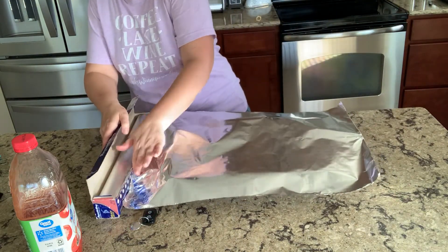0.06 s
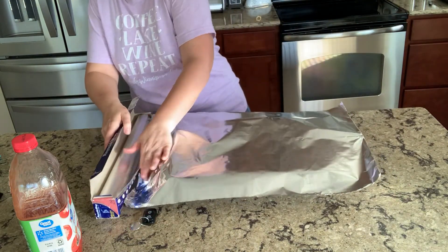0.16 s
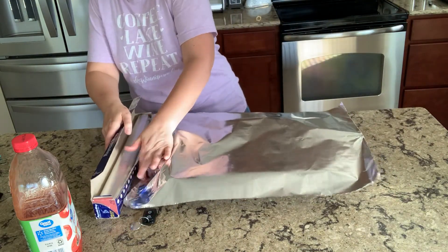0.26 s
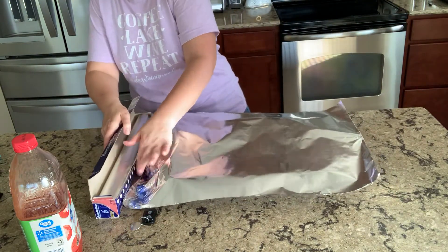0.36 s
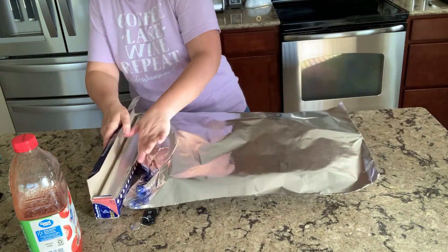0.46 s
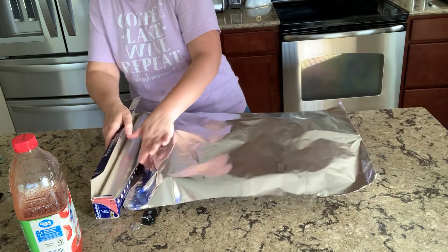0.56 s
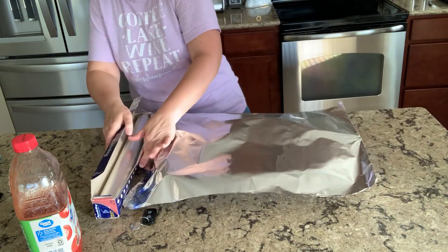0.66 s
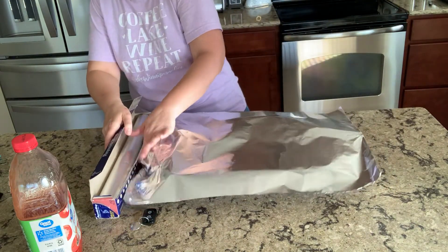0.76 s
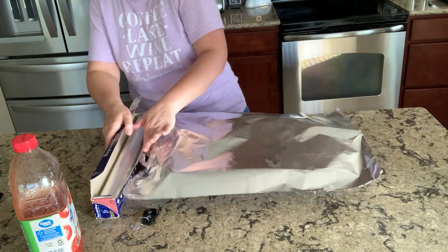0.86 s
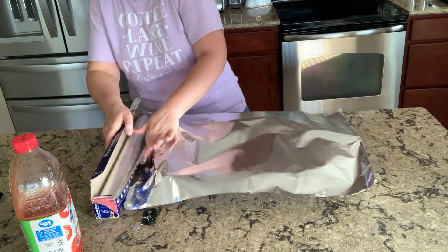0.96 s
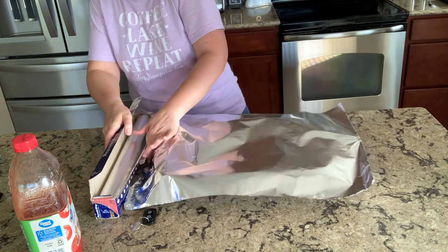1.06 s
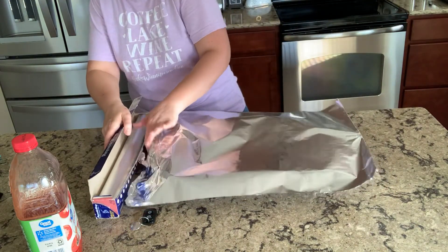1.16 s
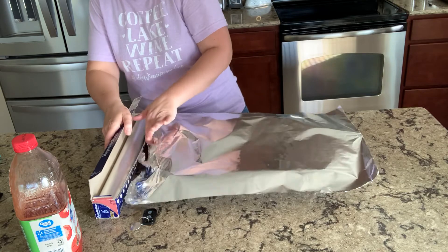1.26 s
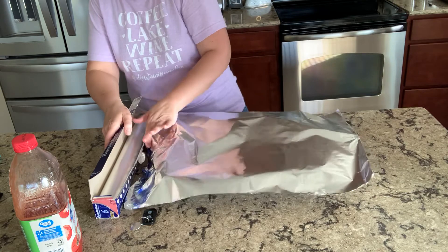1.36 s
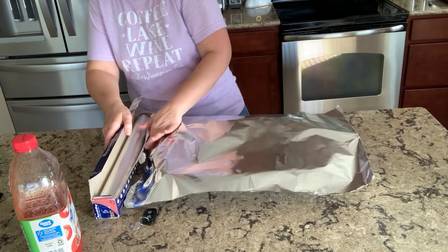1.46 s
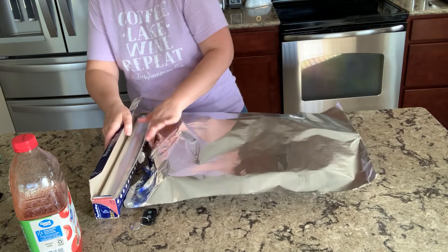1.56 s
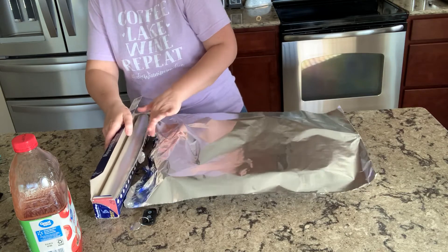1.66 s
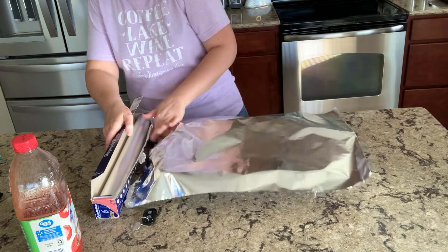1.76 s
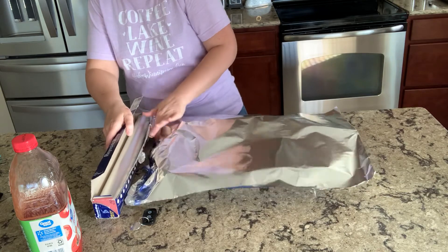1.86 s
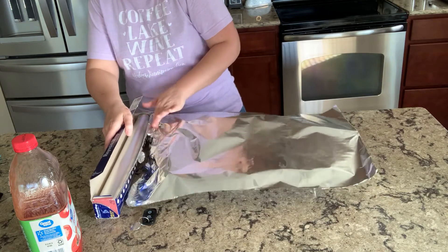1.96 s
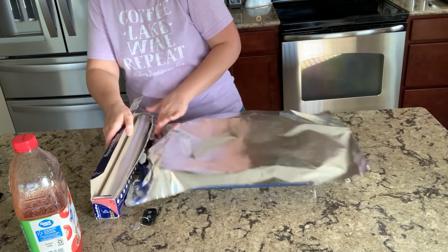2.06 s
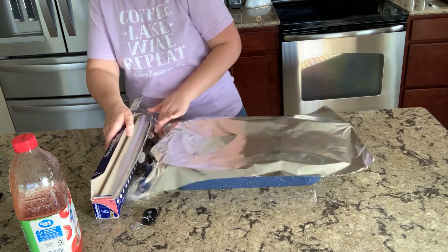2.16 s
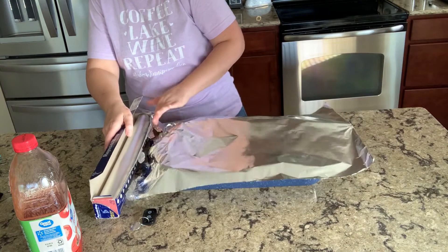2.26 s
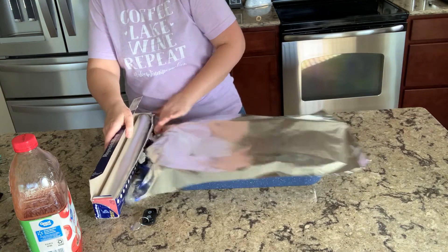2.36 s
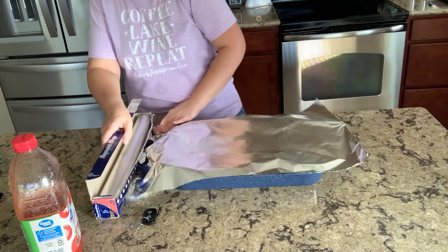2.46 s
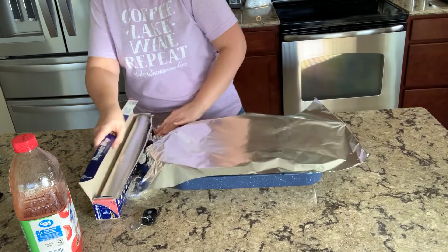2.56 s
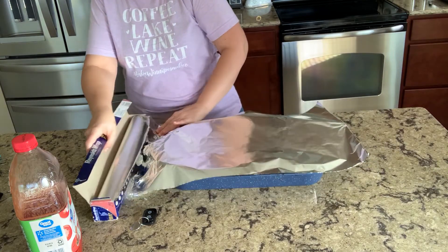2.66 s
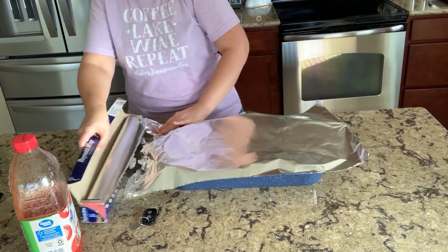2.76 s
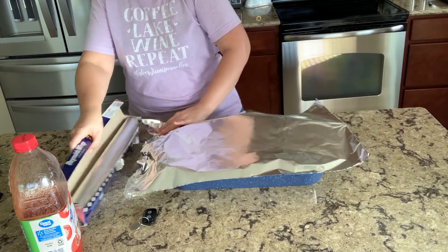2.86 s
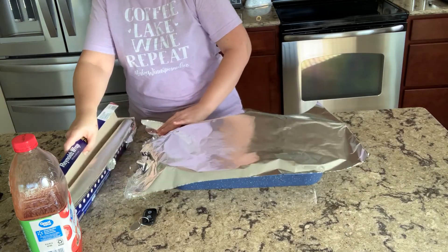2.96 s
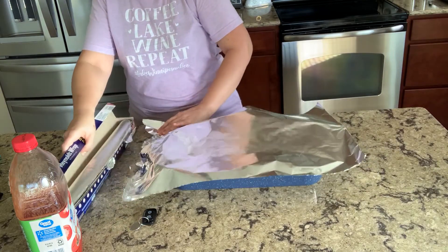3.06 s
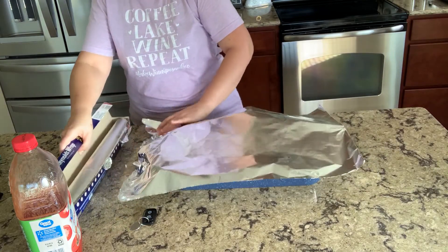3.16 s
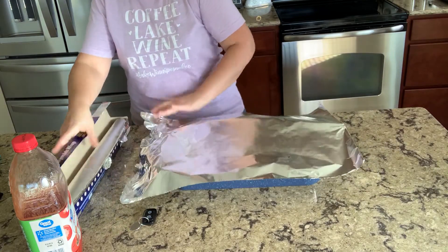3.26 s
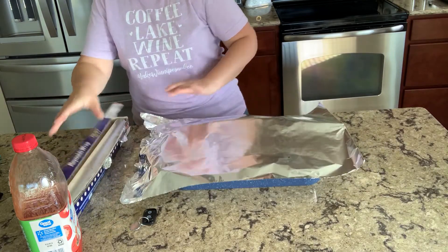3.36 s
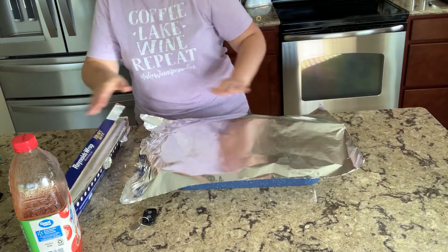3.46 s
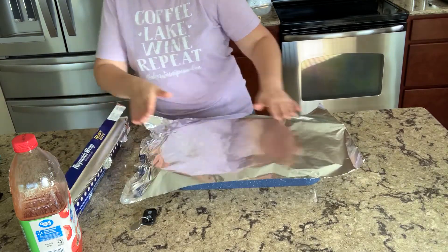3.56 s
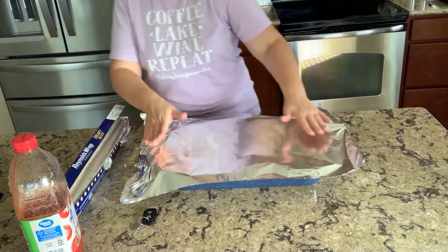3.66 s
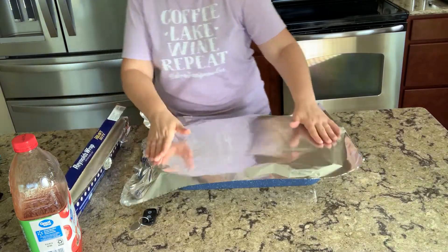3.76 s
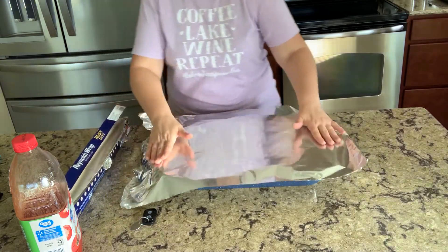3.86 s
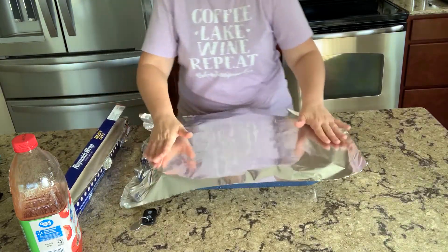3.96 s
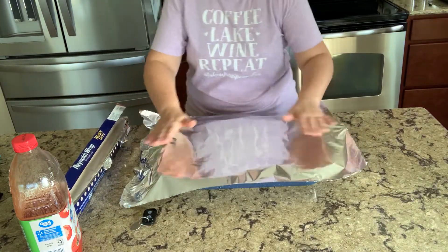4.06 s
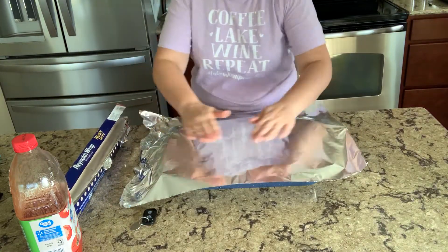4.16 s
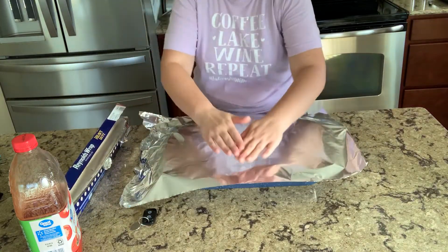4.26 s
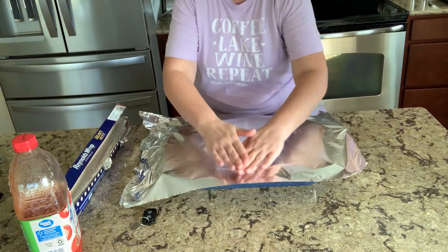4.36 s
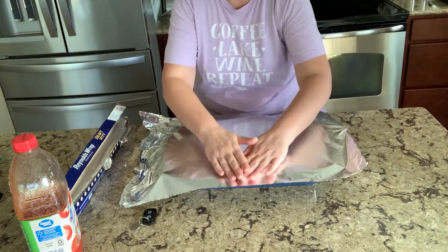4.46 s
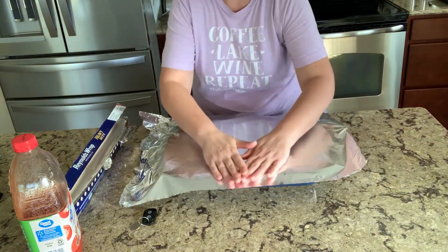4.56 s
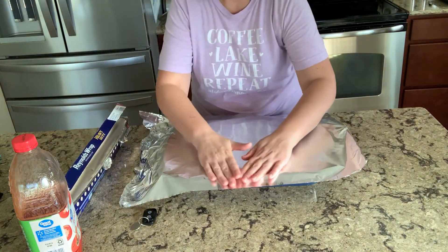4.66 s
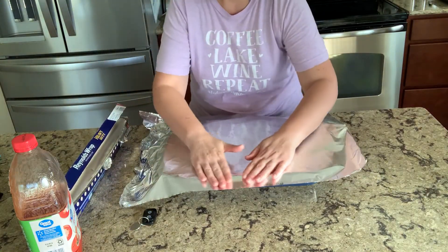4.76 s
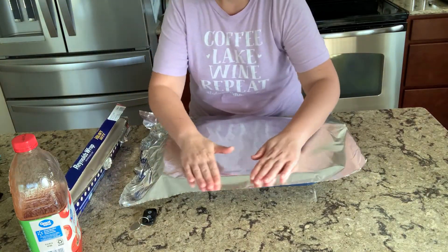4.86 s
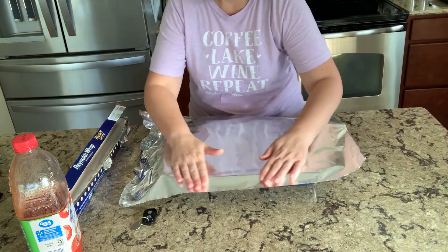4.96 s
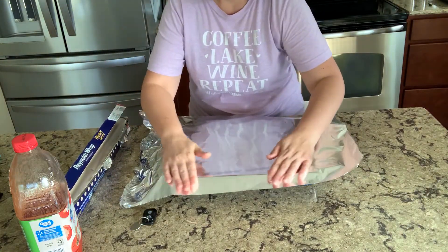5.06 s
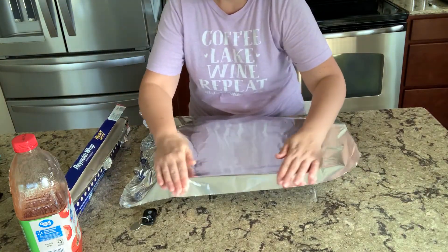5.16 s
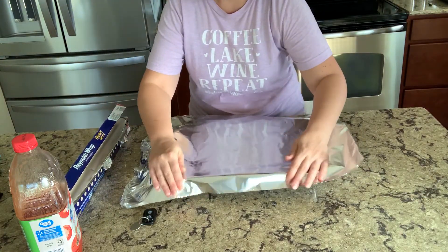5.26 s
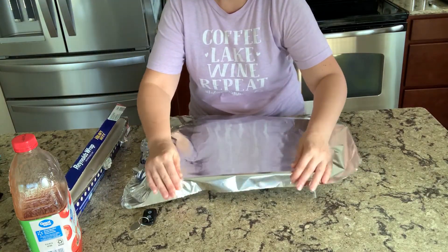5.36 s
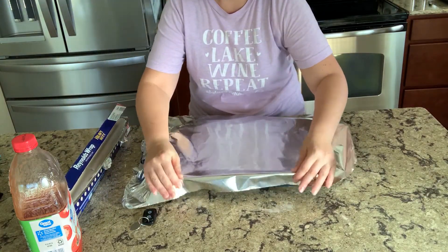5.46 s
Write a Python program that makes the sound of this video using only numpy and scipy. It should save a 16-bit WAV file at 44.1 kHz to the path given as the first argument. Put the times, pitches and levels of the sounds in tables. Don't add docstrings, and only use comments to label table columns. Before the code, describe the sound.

Close, bright foil crackling comes in repeated bursts for about two and a half seconds as a sheet is worked along its box and torn off. Cardboard knocks follow near three seconds, then a sharp rustle and softer, sparser crinkles as it is pressed down. A hard kitchen rings briefly, a fridge hums faintly, and a phone's stereo microphones overload slightly on peaks.

```python
import sys
import numpy as np
from scipy import signal
from scipy.fft import rfft, irfft, next_fast_len
from scipy.io import wavfile
from scipy.ndimage import uniform_filter1d

SR = 44100
rng = np.random.default_rng(int(sys.argv[2]) if len(sys.argv) > 2 else 0)


def voltage_ratio(level):
    return 10 ** (np.asarray(level, float) / 20)


def store_wav(level_fs):
    pcm = np.round(np.clip(np.atleast_2d(level_fs), -1, 1) * 32767)
    wavfile.write(sys.argv[1], SR, pcm.T.astype(np.int16))


N = 243873
SIZE = next_fast_len(N + SR)
HZ = np.fft.rfftfreq(SIZE, 1 / SR) + 1
T = np.arange(N) / SR


def along(table, hz):
    table_hz, *columns = np.transpose(table)
    return np.squeeze([np.interp(np.log(hz), np.log(table_hz + 1), column) for column in columns])


def unit(x):
    return x / np.sqrt(np.mean(np.abs(x) ** 2))


def wander(spacing, smooth, rows=1):
    steps = rng.standard_normal((rows, N // spacing + 1))
    return unit(uniform_filter1d(np.repeat(steps, spacing, axis=1)[:, :N], smooth))


def fade(t, t60):
    return np.exp(-np.log(1000) * t / t60)


def even(response, width_hz):
    return response / np.sqrt(uniform_filter1d(np.abs(response) ** 2, int(width_hz * SIZE / SR)))


def ports(shared, left, right):
    # (frequency [Hz], share [0-1])
    alike = [(60, .7), (500, .55), (2000, .55), (4500, .14), (6400, .25), (8100, .6), (8300, .985),
             (8900, .992), (9600, .998), (9750, .7), (12800, .75), (13200, .99), (15000, .99), (15500, .92)]
    # (frequency [Hz], left ahead of right [rad])
    lead = [(0, 0), (520, -.4), (1300, -.3), (3450, -.9), (5500, -.6), (6700, 1.9), (7600, 2.5),
            (8300, np.pi), (9600, np.pi), (10100, 3.7), (12300, 5.4), (13200, 2 * np.pi)]
    # (frequency [Hz], left minus right [dB])
    balance = [(30, 8), (80, 1.5), (250, 0.8), (700, 0.1), (2800, -1), (8000, -0.1)]
    share = np.clip(along(alike, HZ), 0, 1)
    together = np.sqrt(share) * shared
    own = np.sqrt(1 - share)
    turn = np.exp(.5j * np.interp(HZ, *np.transpose(lead)))
    lean = voltage_ratio(along(balance, HZ) / 2)
    return np.array([(together * turn + own * left) * lean, (together / turn + own * right) / lean])


def kitchen_air():
    # (frequency [Hz], density [dB per Hz])
    air_colour = [(20, -45), (35, -27), (55, -4), (120, -3), (300, -6), (420, -15), (900, -18), (2240, -26),
                  (3600, -26), (5800, -35), (7000, -44), (9000, -50), (12000, -44), (15000, -52)]
    # (frequency [Hz], level [dB])
    hum_tones = [(56, -59), (119, -54), (183, -52.5)]
    noise = ports(*rfft(rng.standard_normal((3, SIZE))))
    air = irfft(noise * voltage_ratio(along(air_colour, HZ)), SIZE)[:, :N]
    drift = uniform_filter1d(rng.standard_normal((len(hum_tones), N)), SR // 8) * np.sqrt(SR / 8)
    hum = 0
    for (hz, db), phase in zip(hum_tones, drift):
        hum = hum + voltage_ratio(db) * np.sin(2 * np.pi * hz * T + 0.77 * phase)
    return voltage_ratio(-43) * unit(air) + np.sqrt(2) * hum * voltage_ratio(np.array([[1.2], [-1.2]]))


def tail(column):
    # (frequency [Hz], sheet t60 [s], kitchen t60 [s])
    ring_times = [(300, 0.072, 0.98), (2020, 0.1, 0.71), (5050, 0.043, 0.65), (8800, 0.12, 0.43),
                  (14000, 0.053, 0.18)]
    hz = np.fft.rfftfreq(SR, 1 / SR) + 1
    out = 0
    for centre in 125 * 2. ** np.arange(8):
        t60 = max(along(ring_times, centre)[column], .002)
        band = np.cos(np.pi / 2 * np.clip(np.log2(hz / centre), -1, 1))
        octave = irfft(rfft(rng.standard_normal(SR)) * band)
        out = out + octave * fade(T[:SR], t60) / np.sqrt(t60 * SR / np.log(1e6))
    return rfft(out, SIZE)


def kitchen_walls():
    walls = voltage_ratio(-5) * ports(*(even(tail(column=1), width_hz=270) for _ in range(3)))
    return walls * np.exp(-2j * np.pi * HZ * .006)


def box():
    # (time [s], peak level [dB], thud above it [dB])
    knocks = [
        (0.2689, -14, -33),
        (0.6403, -19, -2.5),
        (2.8843, -10, -29),
        (2.9591, -11, -6.5),
        (4.5384, -23, -29),
        (4.6809, -22.5, -24),
        (5.2216, -18, -27),
        (5.271, -27, -22),
        (5.309, -17, -33),
    ]
    # (frequency [Hz], level [dB], t60 [s])
    modes = [(275, -1.5, 0.1), (340, -22, 0.035), (643, -15.5, 0.068), (1538, -3, 0.03), (2600, -19, 0.013)]
    out = np.zeros(SIZE)
    t = T[:SR // 4]
    for s, db, thud_db in knocks:
        i = int(s * SR)
        for k, (hz, mode_db, t60) in enumerate(modes):
            pitch_hz = hz * (1 + 0.093 * rng.standard_normal())
            ring = np.sin(2 * np.pi * pitch_hz * t) * fade(t, t60)
            out[i:i + len(t)] += voltage_ratio(db + mode_db + thud_db * (k == 0)) * ring
    return rfft(out) / (1 + (200 / HZ) ** 4)


def ticks():
    # (time [s], peak level [dB], pitch [Hz], length [cycles])
    folds = [(0.1446, -17, 4000, 3.), (0.553, -12, 6000, 4.), (1.17, -8, 4000, 3.), (4.535, -14, 5000, 3.),
             (5.308, -12, 3000, 4.), (3.73, -35, 1800, 14.), (4.516, -30, 6000, 3.), (2.792, -10, 6000, 3.),
             (2.8835, -7, 9000, 2.5), (3.62, -41, 9000, 12.), (3.643, -21, 5300, 8.),
             (3.6435, -22, 3400, 3.5), (3.643, -34, 11500, 12.), (3.735, -43, 9500, 12.),
             (5.017, -16, 12000, 4.), (5.150, -16, 11000, 4.), (5.2315, -8, 11500, 2.5),
             (5.241, -5, 9000, 6.), (5.270, -9, 9200, 7.), (5.289, -18, 9000, 3.), (5.361, -8, 9500, 3.)]
    out = np.zeros(SIZE)
    for s, db, hz, cycles in folds:
        i = int(s * SR)
        turns = T[:400] * hz
        out[i:i + 400] += voltage_ratio(db) * np.sin(2 * np.pi * turns + 1) * np.exp(-2 * turns / cycles)
    return rfft(out) / (1 + (1500 / HZ) ** 2)


def moved(moves, speed, late_s):
    t_ms = np.arange(0, N / SR + .001, .001)
    power = 1e-13
    rise_speed = speed ** 0.55
    for s, hold, first_db, last_db, rise, fall in moves:
        t = t_ms - s - late_s
        db = np.interp(t, [0, hold], [first_db, last_db])
        db = db - 20 * speed * np.maximum(t - hold, 0) / fall
        db = db - 20 * rise_speed * np.maximum(-t, 0) / rise
        power = power + voltage_ratio(2 * db)
    return np.interp(T, t_ms, power)


def work(speed, share, late_s):
    # (time of peak [s], crackle level [dB], rise [s], fall [s], crispness [dB])
    slaps = [(0.247, -17, 0.033, 0.22, -1), (0.553, -34, .005, 0.025, -26), (0.645, -12.5, 0.076, 0.26, 1),
             (1.008, -13.5, 0.16, 0.13, 0.5), (1.075, -17, 0.12, 0.23, -1.5), (1.175, -18, .05, 0.47, -3.5),
             (1.443, -13.5, .14, .13, -1), (1.515, -18, 0.15, 0.31, -5), (1.813, -14, 0.078, 0.29, -1),
             (2.136, -13, 0.087, .22, 1), (2.429, -11, 0.058, 0.15, 3.5), (3.822, -19, 0.022, 0.32, 0),
             (3.925, -26.5, 0.072, 0.31, -3.5), (4.538, -27.5, 0.02, .1, 7),
             (4.568, -25.5, 0.03, .28, -3.5), (5.519, -20.5, .25, 0.18, 1)]
    # (time [s], length [s], first level [dB], last level [dB], crispness [dB])
    drags = [(0.0, 0.013, -27.5, -31, -40), (0.093, .06, -33.5, -39, -28), (0.153, 0.057, -29, -22.5, -12),
             (0.297, 0.11, -24, -22.5, -10.5), (0.817, 0.087, -26, -22, -9.5), (1.258, 0.13, -25, -43, -21),
             (1.912, 0.13, -25.5, -21, -3.5), (2.247, 0.11, -23, -23.5, -8.5), (2.539, .15, -25, -24, -8.5),
             (2.783, 0.19, -26.5, -22.5, -8.5), (3.037, .13, -32.5, -30, -13.5),
             (3.203, .17, -29, -25.5, -11.5), (3.627, .06, -46, -61.5, -37.5),
             (4.034, .14, -28.5, -30, -17), (4.675, 0.28, -29.5, -28.5, -9.5),
             (5.021, 0.098, -31.5, -30.5, -8.5), (5.218, 0.17, -34, -28, -7.5)]
    moves = []
    for s, db, rise, fall, crisp in slaps:
        level = db + share * crisp
        moves.append((s, 0.012, level, level, rise, fall))
    for s, hold, first_db, last_db, crisp in drags:
        moves.append((s, hold, first_db + share * crisp, last_db + share * crisp, 0.025, 0.25))
    rest_db = -75.5 - 18.5 * share
    return 10 * np.log10(moved(moves, speed, late_s) + voltage_ratio(2 * rest_db))


def flapping():
    # (time [s], level [dB], fall [s])
    buckles = [(0.145, -27.5, 0.11), (0.25, -23, 0.14), (0.64, -28, 0.032), (1.02, -19, 0.072),
               (1.4, -29, .1), (1.468, -20.5, 0.085), (2.42, -25, 0.093), (2.905, -27, .1),
               (4.54, -31, 0.11), (4.683, -27, 0.027), (5.09, -33, 0.23), (5.225, -33, .08),
               (5.31, -31.5, .15)]
    flap_db = work(speed=0.97, share=0, late_s=-0.0041) + np.where(T < 2.5, -12.5, -9)
    moves = [(s, .01, db, db, 0.04, fall) for s, db, fall in buckles]
    return 10 * np.log10(voltage_ratio(2 * flap_db) + moved(moves, speed=0.8, late_s=0))


def creases(per_s, spread_db, most_db):
    chance, sign, size = rng.random((3, N))
    size_db = np.minimum(-spread_db * np.log(1 - size), most_db)
    flurry_db = 1.83 * wander(400, 200)[0]
    return unit((chance < per_s / SR) * np.sign(sign - .5) * voltage_ratio(size_db + flurry_db))


def snaps(patch, count):
    # (time [s], peak level [dB], sizzle above it [dB])
    big_creases = [(0.075, -13.5, -20), (0.1426, -9.5, -18), (0.1863, -8.5, -10.5), (0.2436, 6, -10.5),
                   (0.551, -12, -11), (0.611, -10, -16), (0.6345, -4.5, -6.5), (0.6618, -4, -16.5),
                   (1.3974, -12, -2), (1.8014, -2.5, -17), (2.1327, 4.5, -9), (2.409, -11, -21),
                   (2.4219, -16, -18), (2.7922, -7.5, -12.5), (2.8477, -15, -3.5), (2.8834, -3.5, -9),
                   (2.959, -16.5, 3), (3.2, -19, -3.5), (3.8158, -10.5, -4), (4.0276, -10, -7),
                   (4.143, -15.5, -3), (4.5163, -26.5, -6.5), (4.5346, -20, 1), (4.68, -22, -1.5),
                   (4.814, -23, 7.5), (4.876, -11.5, -5.5), (4.978, -13, -8), (5.2188, -9, -6.5),
                   (5.3064, -14.5, -4.5), (5.449, -9.5, -8)]
    out = np.zeros((2, N))
    for s, db, sizzle_db in big_creases[patch::count]:
        i = int(s * SR)
        t = T[:min(SR // 5, N - i)]
        burst = voltage_ratio(db - 13.0) * fade(t, 0.055) * np.minimum(t / 0.00047, 1)
        out[:, i:i + len(t)] += burst * voltage_ratio(np.array([[0], [sizzle_db + 14.0]]))
    return out * rng.standard_normal(N)


def foil(count):
    # (frequency [Hz], density [dB per Hz])
    foil_colour = [(120, -31.5), (270, -12), (420, -10.5), (540, -10), (640, -5.5), (940, -3), (2000, 2),
                   (3600, 5.5), (6600, 2), (9000, 5), (11000, -0.5), (13000, -6), (15500, -14.5)]
    crackle_db = work(speed=1.253, share=0, late_s=0)
    gleam_db = work(speed=2.15, share=0.94, late_s=0.025) - crackle_db
    sizzle_db = work(speed=2.6, share=0.79, late_s=0.0041) - crackle_db
    flap_db = flapping() - crackle_db
    below_1400, below_6800, below_11000 = [1 / (1 + (HZ / edge_hz) ** -6) for edge_hz in (1400, 6800, 11000)]
    busy = voltage_ratio(2.32 * wander(4000, 3000, rows=count))
    busy = busy / np.sqrt(np.sum(busy ** 2, axis=0))
    heard, total = 0, 0
    for patch in range(count):
        clicks = creases(per_s=1200., spread_db=2.5, most_db=10.5) * voltage_ratio(crackle_db - 1.5) * busy[patch]
        body, fine = snaps(patch, count)
        drive = (1 - below_1400) * rfft(clicks * voltage_ratio(flap_db + 13.0) + 2.2 * body, SIZE)
        drive = drive + (below_1400 - below_6800) * rfft(clicks + body, SIZE)
        drive = drive + (below_6800 - below_11000) * rfft(clicks * voltage_ratio(gleam_db + 0.6) + fine, SIZE)
        drive = drive + below_11000 * rfft(clicks * voltage_ratio(sizzle_db + 9.0) + fine, SIZE)
        drive = drive * voltage_ratio(along(foil_colour, HZ))
        facet_hz = 900 * 1.53 ** patch
        drive = drive * voltage_ratio(1.5 * np.exp(-(np.log(HZ / facet_hz) / .4) ** 2))
        lag = np.exp(-2j * np.pi * HZ * rng.random((3, 1)) * 0.001426)
        paths = [even(click + voltage_ratio(3) * tail(column=0), width_hz=203) for click in lag]
        heard = heard + drive * voltage_ratio(5) * ports(*paths)
        total = total + drive
    return heard, total


def scene():
    near_foil, total_foil = foil(count=5)
    knocks, dry_ticks = box(), ticks()
    straight = near_foil + (knocks + dry_ticks) * ports(1, 1, 1j)
    echoes = (total_foil + knocks + .5 * dry_ticks) * kitchen_walls()
    return irfft(straight + echoes, SIZE)[:, :N] + kitchen_air()


def top_cut(x):
    return signal.sosfilt(signal.butter(12, 15670, fs=SR, output="sos"), x)


def record(dry):
    low_pass = signal.ellip(10, .2, 80, 15760, fs=SR, output="sos")
    finished = np.clip(signal.sosfilt(low_pass, dry), -1, 1)
    return top_cut(finished)


dry = scene()
out = record(dry)
store_wav(out)
```